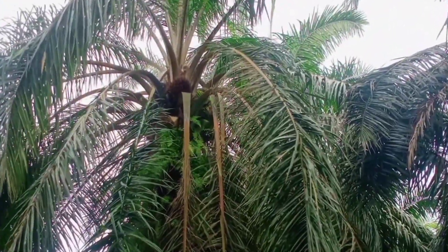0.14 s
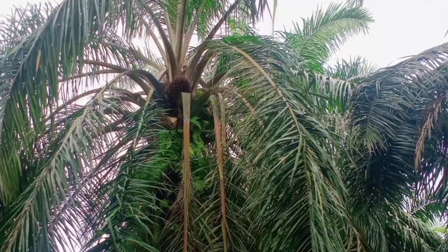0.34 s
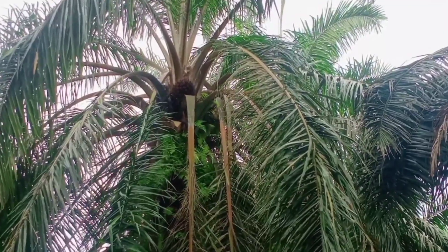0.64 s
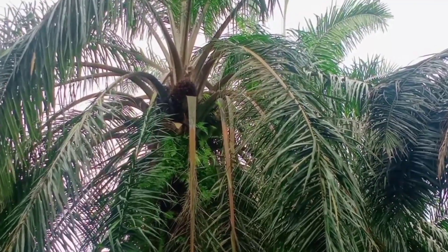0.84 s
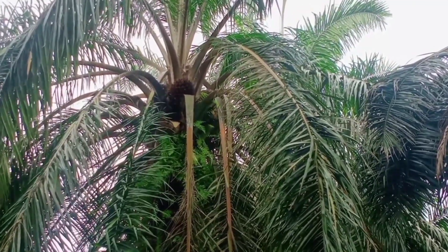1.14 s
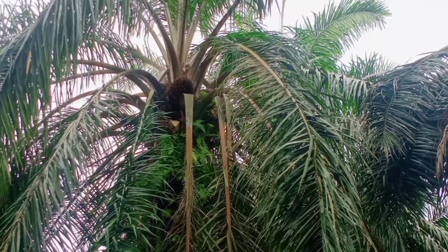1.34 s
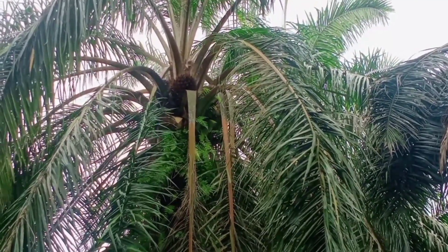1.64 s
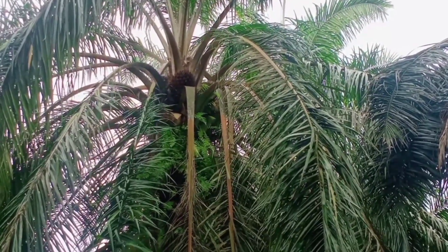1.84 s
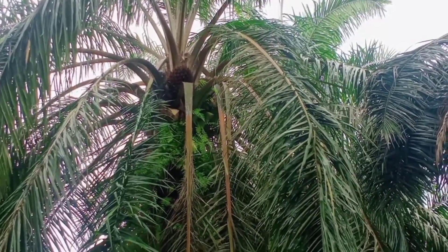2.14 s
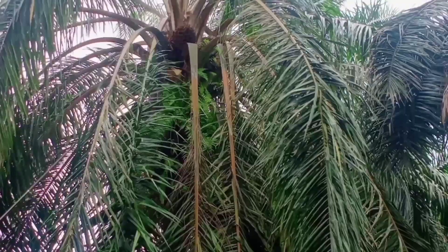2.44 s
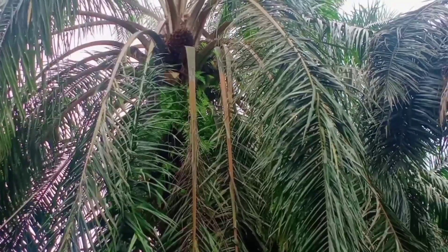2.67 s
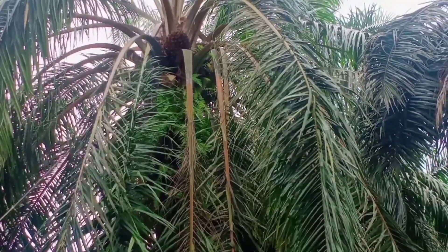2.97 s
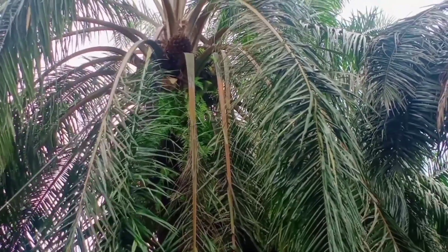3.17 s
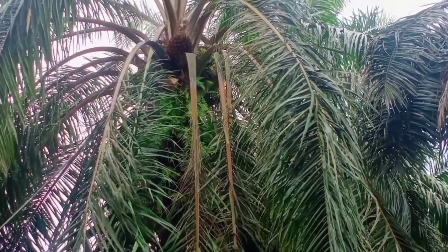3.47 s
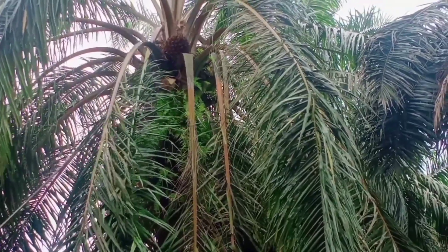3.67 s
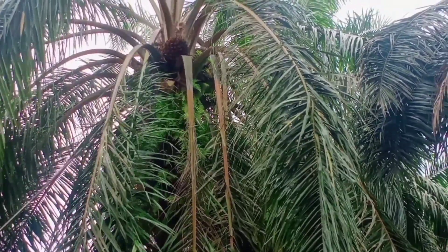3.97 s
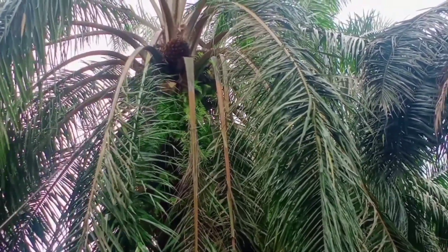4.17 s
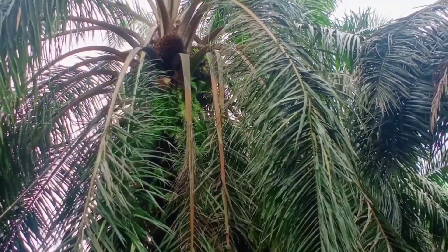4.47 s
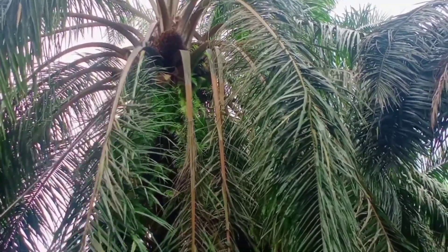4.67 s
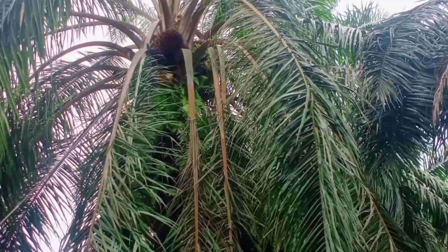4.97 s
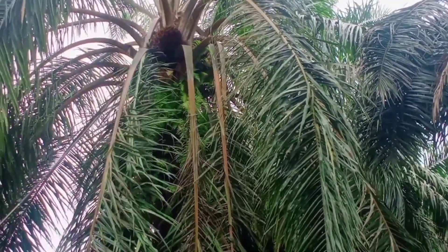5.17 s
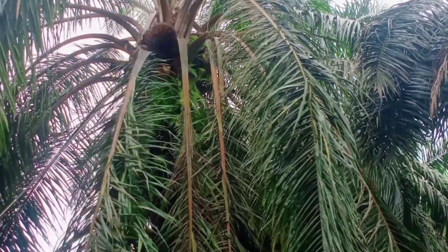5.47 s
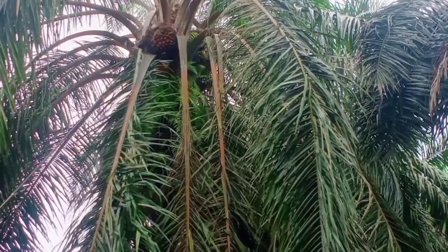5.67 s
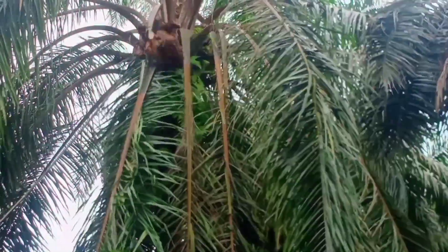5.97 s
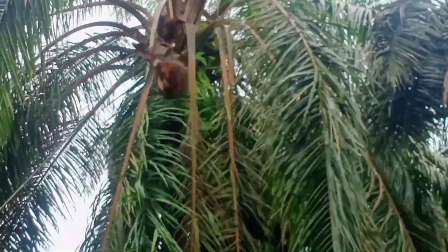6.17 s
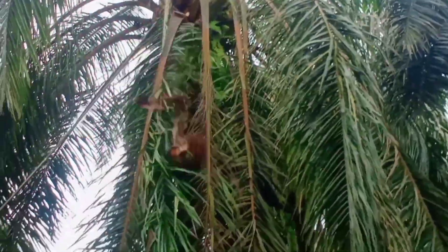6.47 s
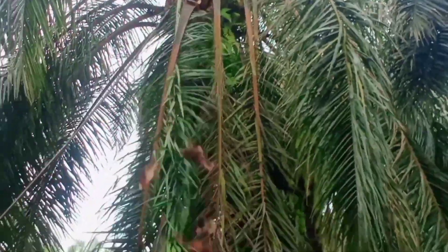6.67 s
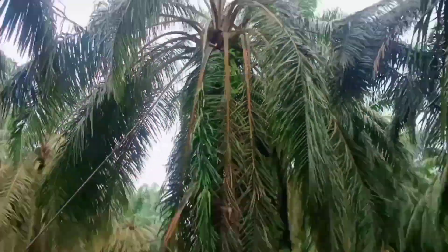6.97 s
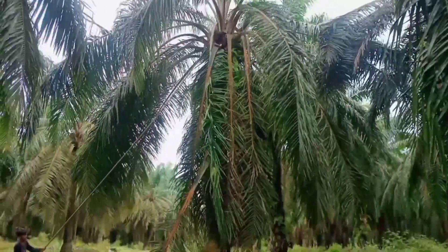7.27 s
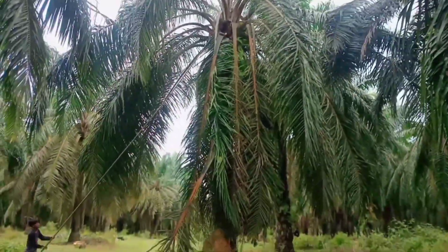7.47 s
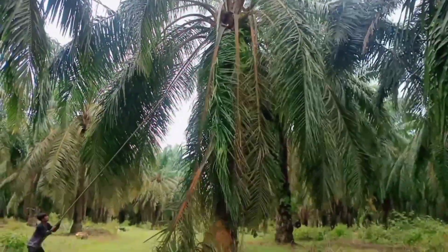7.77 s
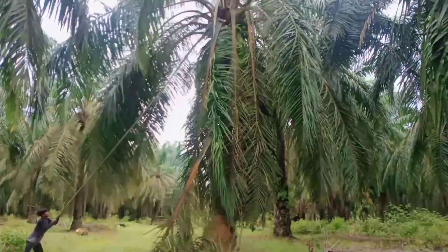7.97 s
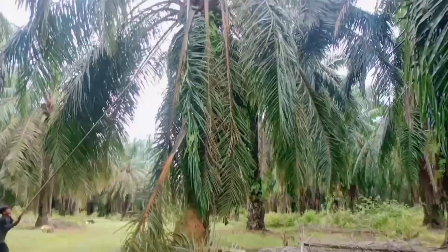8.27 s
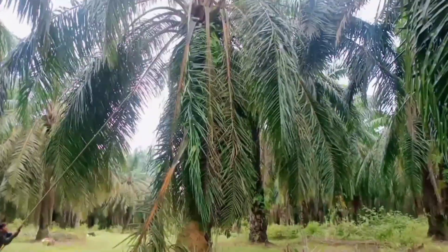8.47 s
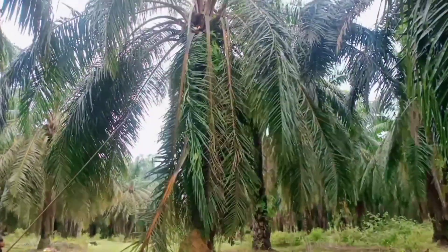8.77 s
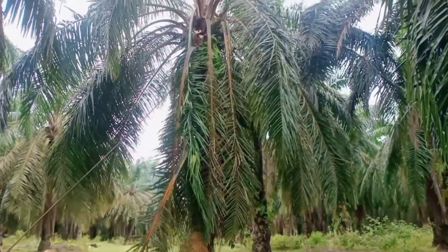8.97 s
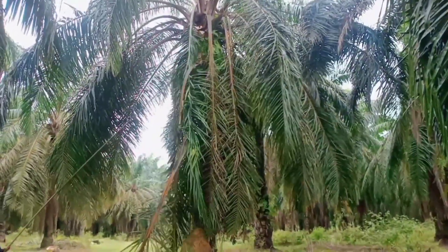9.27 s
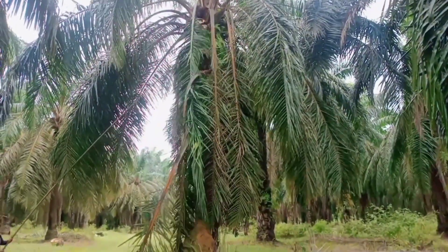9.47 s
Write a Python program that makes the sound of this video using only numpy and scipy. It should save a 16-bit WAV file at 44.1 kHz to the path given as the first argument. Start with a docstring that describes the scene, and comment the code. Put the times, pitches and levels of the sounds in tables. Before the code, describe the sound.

Outdoors in a palm grove, insects hiss faintly over thin air noise. A blade on a pole knocks and rips at stalks, in irregular bright cracks with short woody rings. Dry snaps gather, then a bunch crashes through rustling leaves and thuds on soft soil. After a lull, hard chops resume and leaves rustle louder. A small microphone overloads slightly on the peaks, with two brief dropouts.

```python
"""Cutting a fruit bunch from a tall palm

A sickle on a long pole saws and knocks at palm stalks high in a plantation: torn noise and struck resonances.
A fruit bunch tears loose, crashes down through rustling, snapping leaves and thuds on the soil in low cycles.
Insects hiss in two noise bands over the air of the grove, and trunks and crowns scatter the cutting sounds.
Twice the sound fades to silence and comes back."""
import sys
import numpy as np
from scipy import signal
from scipy.fft import irfft
from scipy.io import wavfile

SR = 44100
rng = np.random.default_rng(int(sys.argv[2]) if len(sys.argv) > 2 else 0)


def unload_wav(signal):
    """Save mono or channel-first audio to the path in sys.argv[1] as 16-bit WAV at rate SR, clipped to [-1, 1]."""
    wavfile.write(
        sys.argv[1],
        SR,
        np.round(np.clip(np.atleast_2d(signal).T, -1, 1) * 32767).astype(np.int16),
    )


N = 423801

# All table levels are relative: each source has its own trim in the mix.
# spectrum of stalk noise, shaped within bass, middle and treble: hz, density_db (per Hz)
STALK = [(60, -67.5), (100, -19), (223, -8), (430, -6), (521, -13), (795, -2), (1070, -4.5), (1500, -1.5),
         (2950, -3), (3890, -3.5), (5690, -30), (7980, -2), (11000, -12), (13800, -9), (15700, -22)]
# spectrum of leaf noise, shaped likewise: hz, density_db (per Hz)
LEAF = [(59, -42), (100, -31), (137, -20), (193, -18), (313, -12), (521, -13.5), (671, -12.5), (2390, -4),
        (3570, 2), (5690, -18.5), (7650, -2.5), (10100, -11), (13500, -10.5), (15700, -7.5)]
# resonances of stalk, pole and blade together: pitch_hz, width_hz, level_db
RINGS = [(254, 22, 3), (417, 40, 5.5), (577, 43, -4), (800, 130, -8.5), (1220, 58, -11.5), (1530, 92, -1),
         (1955, 170, -31), (2246, 61, 3.5), (2473, 92, -10.5), (2790, 110, -24), (2974, 140, -0.5),
         (3290, 74, -0.5), (3750, 150, 1), (4740, 95, -11)]
# dips to silence: fade_out_s, silent_s, fade_in_s, full_s
FADES = [(2.26, 2.342, 2.42, 2.425), (8.305, 8.351, 8.39, 8.425)]
SPLITS_HZ = 850, 5600  # bass | middle | treble


def amp(db):
    """Decibels to amplitude."""
    return 10 ** (np.asarray(db) / 20)


def evened(x):
    """Scales a signal to rms 1."""
    return x / np.sqrt(np.mean(x ** 2) + 1e-20)


def add(mix, s, sound):
    """Lays a sound into the mix from s seconds on."""
    part = mix[..., round(s * SR):][..., :sound.shape[-1]]
    part += sound[..., :part.shape[-1]]


def curves(rows):
    """Columns of a table, sample by sample over the whole scene."""
    s, *columns = np.transpose(rows)
    return [np.interp(np.arange(N) / SR, s, column) for column in columns]


def parts(points):
    """Causal (minimum-phase) responses of the bass, middle and treble of a spectrum, energy 1 each."""
    hz = np.fft.rfftfreq(4096, 1 / SR)
    f, db = np.transpose(points)
    gain = amp(np.interp(np.log(hz + 1), np.log(f + 1), db))
    above_bass, above_middle = (1 / (1 + (edge / (hz + 1)) ** 12) for edge in SPLITS_HZ)
    responses = []
    for power in (1 - above_bass, above_bass - above_middle, above_middle):
        log_gain = np.log(gain * np.sqrt(abs(power)) + 1e-5)
        mirrored = np.r_[log_gain, log_gain[-2:0:-1]]
        phase = signal.hilbert(mirrored).imag[:len(hz)]
        taps = irfft(np.exp(log_gain - 1j * phase))[:2048]
        responses.append(taps / np.linalg.norm(taps))
    return responses


def colour(drives, points):
    """Filters one excitation through each part of a spectrum and sums them."""
    return sum(signal.oaconvolve(x, taps)[:N] for x, taps in zip(drives, parts(points)))


def ring(x, hz, width):
    """Two-pole resonance whose answer to a click has energy of about 1."""
    r = np.exp(-np.pi * width / SR)
    poles = [1, -2 * r * np.cos(2 * np.pi * hz / SR), r * r]
    return signal.lfilter([1, 0, -1], poles, x) * np.sqrt(1 - r)


def wander(per_s):
    """Slow chance: straight lines between random knots of spread 1."""
    knots = rng.standard_normal(4000)
    return np.interp(np.arange(N) / SR * per_s, np.arange(len(knots)), knots)


def crackle(per_s, spread_db, smooth):
    """Tiny snaps of uneven size over a share of smooth noise, rms 1."""
    size = amp(spread_db * np.minimum(rng.exponential(1, N), 5)) * rng.standard_normal(N)
    snap_train = evened(size * (rng.random(N) < per_s / SR))
    return evened(snap_train + smooth * rng.standard_normal(N))


def passages(x):
    """Splits a signal at the two fade-ins."""
    return np.split(x, [round(times[2] * SR) for times in FADES])


def air():
    """Distant wash of coloured noise over a lumpy low rumble of wind and far traffic."""
    # spectrum of the distant wash: hz, density_db (per Hz)
    wash_spectrum = [(24, -8), (40, -5), (248, -1.5), (475, -11), (3590, -15), (5780, -31), (6550, -3.5),
                     (7420, -4.5), (9060, -15), (10300, -6.5), (11900, -19), (15700, -9.5)]
    # low wash of wind and far traffic: start_s, level_db
    rumble = [(0.0, -48.5), (2.09, -53), (2.3, -57), (2.86, -45.5), (5.89, -68), (7.31, -44), (7.87, -55),
              (9.61, -50)]
    noise = rng.standard_normal((2, N))
    wash_db = np.array([[-48.5], [-49], [-48]]) + 0.27 * wander(12.0)
    wash = colour(amp(wash_db) * noise[0], wash_spectrum)
    low = evened(ring(ring(noise[1], 85, 90), 85, 90))
    return wash + amp(curves(rumble)[0] + 1.6 * wander(16)) * low


def insects():
    """Many callers blur into two hissing bands: noise through doubled resonances, for steep sides."""
    # chorus level over time: start_s, lower_band_db, upper_band_db
    chorus = [(0, -43.5, -50.5), (2.1, -41.5, -50), (3.5, -40, -48), (5.4, -53, -66), (7.9, -54, -76),
              (8.38, -42, -58), (8.4, -43.5, -51.5), (9.61, -36, -56)]
    # lower and upper band: centre_hz, width_hz (of each of the two resonances)
    bands = [(7400, 640), (10300, 1000)]
    out = 0
    for db, (hz, width) in zip(curves(chorus), bands):
        band = ring(ring(rng.standard_normal(N), hz, width), hz, width)
        out = out + amp(db - 0.5 + 1.1 * wander(2.8)) * evened(band)
    return out


def effort():
    """Tearing force in bass, middle and treble, and the pitch where the blade bites: rise, hold, let go."""
    # fibre tearing under the blade and under the loosening, falling bunch:
    # full_force_s, rise_s, hold_s, force_db, bass_share_db, treble_share_db, bite_pitch_hz
    pull_table = [(0.07, 0.028, .04, -36, -5, 4, 810), (0.146, 0.042, 0.0098, -26.5, -10, 1, 3750),
                  (0.633, 0.012, 0.07, -35.5, -5, 2, 3020), (0.77, 0.026, .02, -34.5, -10, -6, 1530),
                  (0.817, 0.049, .03, -29.5, -3, -9, 585), (1.452, 0.068, 0.024, -28.5, -2.5, -1, 2520),
                  (2.876, .012, 0.022, -28.5, -7.5, -5, 2000), (2.908, 0.021, 0.11, -14, -12, -5.5, 2370),
                  (3.815, 0.027, 0.073, -29, -18.5, -8, 1585), (4.247, 0.044, 0.04, -14, -9.5, -5, 3050),
                  (4.77, 0.035, 0.023, -29.5, -10, -1, 3550), (5.01, 0.051, 0.012, -15.5, -12.5, -3, 2950),
                  (5.035, 0.012, 0.0074, -15, -10.5, -4.5, 3300),
                  (5.769, 0.013, 0.0068, -27.5, -7.5, 2, 2080), (5.88, 0.014, 0.014, -27.5, -13, 7.5, 3450),
                  (6.915, 0.024, 0.019, -17, -14, 7.5, 3630), (7.062, 0.018, 0.011, -16.5, -9.5, 5.5, 3280),
                  (8.255, 0.043, .022, -16.5, -14.5, -2, 3220), (8.3, .015, 0.0065, -24, -14, -6, 2110),
                  (8.666, 0.03, 0.037, -12.5, -13, -6, 3050), (8.718, .02, 0.016, -12, -15, -6, 2000),
                  (8.828, 0.023, 0.026, -22.5, -30, -3.5, 3320)]
    bite_start_db, let_go_db_per_s = -22.5, 335  # force at first touch; fall after the hold
    force, bite_hz = np.zeros((3, N)), np.zeros(N)
    for s, rise, hold, db, bass_db, treble_db, hz in pull_table:
        t = np.arange(-rise, hold + 40 / let_go_db_per_s, 1 / SR)  # 0 = full force
        rise_db = bite_start_db * np.maximum(-t / rise, 0)
        fall_db = let_go_db_per_s * np.maximum(t - hold, 0)
        level = amp(db + rise_db - fall_db) * signal.windows.tukey(len(t), .25)
        add(force, s + t[0], level * amp([[bass_db], [0], [treble_db]]))
        bite_hz[round((s + t[0]) * SR):][:len(t)] = hz
    return force, bite_hz


def shaken():
    """The crown takes up the force of each tear and settles; nothing carries over past a fade-in."""
    # how far a tear shakes bass, middle and treble leaf noise: level_db
    shake_db = [-30.5, -18.5, -46]
    settle_s = 0.28  # time constant
    keep = np.exp(-1 / (settle_s * SR))
    force = effort()[0][1]
    motion = [signal.lfilter([1 - keep], [1, -keep], x) for x in passages(force)]
    return np.outer(amp(shake_db), np.concatenate(motion))


def leaves():
    """Stiff leaflets brush and tick against each other in clumps; now and then one cracks."""
    # rustle of moving leaves: start_s, level_db, treble_level_db
    rustle = [(0.0, -54.5, -59.5), (1.9, -57.5, -52), (2.3, -49, -53), (2.8, -52.5, -59), (3.2, -41, -48),
              (4.7, -44.5, -44.5), (5.45, -39.5, -44), (5.74, -35.5, -41), (5.95, -31, -33),
              (6.17, -29.5, -34), (6.24, -36, -40.5), (6.42, -33, -35.5), (6.6, -20, -26.5),
              (6.78, -16, -20.5), (6.89, -16.5, -25), (6.98, -20.5, -22.5), (7.03, -25.5, -28),
              (7.14, -27, -30), (7.3, -38, -45), (8.2, -51.5, -50.5), (8.66, -49.5, -54),
              (8.82, -30, -39.5), (9.07, -30.5, -34), (9.38, -26.5, -31), (9.46, -24, -28),
              (9.61, -23, -31.5)]
    db, treble_db = curves(rustle)
    clumps_db = 0.52 * wander(14) + 1.3 * wander(63)
    brush = crackle(per_s=1600, spread_db=1.0, smooth=2.6) * amp(clumps_db)
    crack_hits = abs(crackle(per_s=120, spread_db=-7.0, smooth=0))
    crack_level = evened(signal.lfilter([1], [1, -.985], crack_hits))  # each dies in a few ms
    cracks = crack_level * rng.standard_normal(N) * np.array([[.2], [.25], [.5]])  # strongest in the treble
    cracks[2] += 0.18 * crackle(per_s=50, spread_db=1.5, smooth=0)  # leaf tips tick, thin and bright
    sway_db = 1.1 * np.array([wander(9.0), wander(6.5), wander(8.2)])  # bass, middle, treble apart
    level = amp([db - 15.5, db + .1, treble_db + 5.5]) + shaken()
    return colour(level * amp(sway_db) * (brush + cracks), LEAF)


def snaps():
    """Dry leaf ribs and loose fruit: a sharp tick with a short scratchy tail and no ring."""
    # dry snaps: start_s, peak_db, treble_share_db
    snap_table = [(2.52, -25, -12), (2.713, -25.5, -9), (3.615, -7.5, -5), (3.799, -16.5, 6),
                  (3.925, -15.5, 5.5), (4.45, -28, -14), (4.646, -22, -14), (5.189, -18.5, -1),
                  (5.403, -21, -12), (5.512, -21, -1), (5.546, -22, 6), (5.58, -15, -1), (5.642, -14.5, 2),
                  (5.828, -13, -18), (5.986, -15, -1), (6.022, -17, 3), (6.095, -15, -8), (6.54, -28, 1),
                  (6.569, -9.5, 5), (6.629, -8, 4), (7.188, -14, 0), (7.431, -14, -38), (7.497, -17.5, -26),
                  (7.523, -16.5, -18), (7.561, -20, -4), (8.084, -21, -16.5), (8.962, -19, 6),
                  (8.986, -23, -9), (9.207, -21, 8), (9.301, -9, -6), (9.408, -19, -13), (9.448, -6.5, 0)]
    out, t = np.zeros((3, N)), np.arange(3000) / SR
    for s, db, treble_db in snap_table:
        decay = amp(-60 * t / 0.0066) + amp(-7.5 - 60 * t / 0.18)
        tick = decay * rng.standard_normal(len(t))
        add(out, s, tick * amp(db + np.array([[-12], [0], [treble_db]])))
    return amp(-9) * colour(out, LEAF)


def thuds():
    """The bunch lands on soft soil: a few pointed low cycles, small bounces, and a faint hum of the ground."""
    # landing and bounces: start_s, level_db, pitch_hz, length_cycles
    thud_table = [(7.084, -4, 90.7, 3.3), (7.142, -21, 92, 2.5), (7.179, -33, 129, 3)]
    out = np.zeros(N)
    for s, db, hz, cycles in thud_table:
        turns = np.arange(0, cycles, hz / SR)
        angle = 2 * np.pi * (turns - .4)
        wave = np.sin(angle) - 0.11 * np.sin(3 * angle)
        edges = np.minimum(turns / 0.17, 1) * np.minimum((cycles - turns) / .6, 1)
        add(out, s, amp(db - 3.0 * turns) * wave * edges)  # loses 3 dB a cycle
    landing_s, t = thud_table[0][0], np.arange(SR) / SR
    hum = evened(ring(rng.standard_normal(SR), 95, 60))
    add(out, landing_s, amp(-27 - 60 * t / 0.56) * hum)
    crush = evened(ring(rng.standard_normal(SR), 160, 210))
    crush_level = amp(-15 - 60 * t / 0.22) * np.minimum(t / 0.021, 1)
    add(out, landing_s - .035, crush_level * crush)  # undergrowth gives way just before the soil is hit
    return out


def knocks():
    """A blow is a crack and a dying spray of noise; it rings the modes nearest the pitch of the struck part."""
    # knocks on stalk and pole: start_s, peak_db, struck_pitch_hz, bass_share_db, treble_share_db
    knock_table = [(0.119, -15, 3770, -7.5, -8), (0.14, -11.5, 2820, -8, -9), (0.406, -26, 860, -9, -26),
                   (0.414, -25.5, 1540, -10, -29), (0.633, -7, 557, -29, -15), (0.822, -19, 1930, -4, -22),
                   (1.191, -11.5, 3470, -25, -27), (1.197, -18, 1530, -16, -27),
                   (1.449, -14, 597, -23, -16), (1.665, -19.5, 3440, -36, -20), (1.969, -26.5, 580, 1, -5),
                   (2.442, -24.5, 3170, -19, -9), (2.915, 0, 1490, -31, -16), (2.972, -2, 2460, -27, -4),
                   (3.454, -24, 3290, -8, 4), (3.502, -12, 1464, -11, -15),
                   (3.517, -20.5, 1480, -3.5, -42.5), (3.609, -8, 3520, -12, -16),
                   (3.678, -17, 2040, -6, -2), (3.699, -5, 2370, -21, -15), (3.825, -14.5, 3250, -7, -11),
                   (3.855, -12.5, 1580, -19, -7), (4.243, -4.5, 3080, -36, -8), (4.27, 4, 2130, -11, -22),
                   (4.523, -23, 2890, -36, -7), (4.686, -20.5, 2290, -21, -12), (4.979, -23, 2270, -9, -12),
                   (5.005, -2.5, 2900, -21.5, -8), (5.039, -1.5, 3250, -46, -3.5),
                   (5.134, -15.5, 3320, -37, -15), (5.424, -32, 527, 8, -8), (5.776, -14, 2040, -16.5, -6),
                   (6.598, -6.5, 1460, -26, 5), (6.912, 0.5, 3030, -43, -8), (7.05, -3.5, 3840, -17, -7),
                   (7.084, 2, 2034, -9.5, -7), (8.105, -12, 2156, -53, -10.5), (8.177, -19, 1820, -6, -9),
                   (8.247, -11, 3280, -26, -22), (8.268, 1.5, 3570, -19, -7.5), (8.304, -8, 2040, -27, -6),
                   (8.664, -27, 3040, -17, -24), (8.695, 5.5, 3620, -18, -12), (8.739, 4.5, 1620, -29, -10),
                   (8.832, -6.5, 3280, -32, -20), (8.869, -8.5, 1540, -35, -23),
                   (8.965, -12.5, 4500, -25, -8)]
    blade_hz, blade_width_hz, blade_db = 3350, 9, -25  # steel rings on after blows near its pitch
    blow, modes = np.zeros((3, N)), np.zeros((len(RINGS), N))
    t, centres = np.arange(6000) / SR, np.array(RINGS)[:, 0]
    for s, db, hz, bass_db, treble_db in knock_table:
        spray_level, crack_level = amp(db - 60 * t / 0.1), amp(db + 4.0 - 60 * t / 0.0041)
        attack = np.minimum(t / 0.0011, 1)
        burst = (spray_level + crack_level) * attack * rng.standard_normal(len(t))
        add(blow, s, burst * amp([[bass_db], [0], [treble_db]]))
        near = np.exp(-(np.log(centres / hz) / 0.045) ** 2)
        near += .5 * amp(bass_db) * (centres < SPLITS_HZ[0])  # heavy blows also shake the low modes
        add(modes, s, burst * near[:, None])
    # the modes ring at equal level here; only how hard each is struck differs
    rings = sum(ring(x, hz, width) for x, (hz, width, _) in zip(modes, RINGS))
    blade_drive = modes[np.argmin(abs(centres - blade_hz))]
    rings += amp(blade_db) * ring(blade_drive, blade_hz, blade_width_hz)
    return amp(-12.0) * colour(blow, STALK), amp(-9) * rings


def pulls():
    """Fibres tear in a dense crackle; the blade slips, so each ring swells and fades, most near the bite."""
    force, bite_hz = effort()
    tear = crackle(per_s=3000, spread_db=3.0, smooth=1.0) * amp(0.99 * wander(150))
    rings = np.zeros(N)
    for hz, width, db in RINGS:
        near_db = 13.2 * np.exp(-(np.log((bite_hz + 1) / hz) / 0.069) ** 2)
        part_force = force[int(hz > SPLITS_HZ[0])]  # bass or middle
        drive = part_force * tear * amp(near_db + 6.8 * wander(35))
        rings += amp(db - 15.0) * ring(drive, hz, width)
    return amp(-5.0) * colour(force * tear, STALK), rings


def grove(x):
    """Trunks and crowns scatter the sound: sparse taps, treble dying first, cut off at each fade-in."""
    taps = np.zeros(SR // 2)
    slots = np.arange(400, len(taps) - 20, 20)
    taps[slots + rng.integers(0, 20, len(slots))] = rng.choice([-1., 1.], len(slots))
    hz, t, z = signal.stft(taps, SR, nperseg=256)
    t60 = np.interp(hz, [300, 3000, 12000], [.4, .45, .25])  # seconds to fall 60 dB
    tail = signal.istft(z * amp(-60 * t / t60[:, None]), SR, nperseg=256)[1]
    tail = tail / np.linalg.norm(tail)
    return np.concatenate([signal.oaconvolve(part, tail)[:len(part)] for part in passages(x)])


def scene():
    """Cutting, knocking and snapping with their echo, over thuds, leaves, insects and air."""
    tearing, pull_rings = pulls()
    blows, knock_rings = knocks()
    broad, tonal = tearing + blows + snaps(), pull_rings + knock_rings
    echo = amp(-12) * grove(broad + 0.44 * tonal)  # the tail carries more of the noise than of the rings
    return (broad + tonal + echo + thuds() + leaves() + insects() + air())[None]


def record(dry):
    """A small microphone loses the deep bass; soft overload on the peaks, straight fades, then a band limit."""
    t, gain = np.arange(N) / SR, np.ones(N)
    for times in FADES:
        gain = gain * np.interp(t, times, [1, 0, 0, 1])
    thin = signal.sosfilt(signal.butter(3, 50, "high", fs=SR, output="sos"), dry)
    faded = 0.85 * np.tanh(thin / 1.125) * gain
    band_limit = signal.firwin(511, 15800, window=("kaiser", 9), fs=SR)  # low-pass edge in Hz
    return signal.oaconvolve(faded, band_limit[None], "same")


dry = scene()
out = record(dry)
unload_wav(out)
```